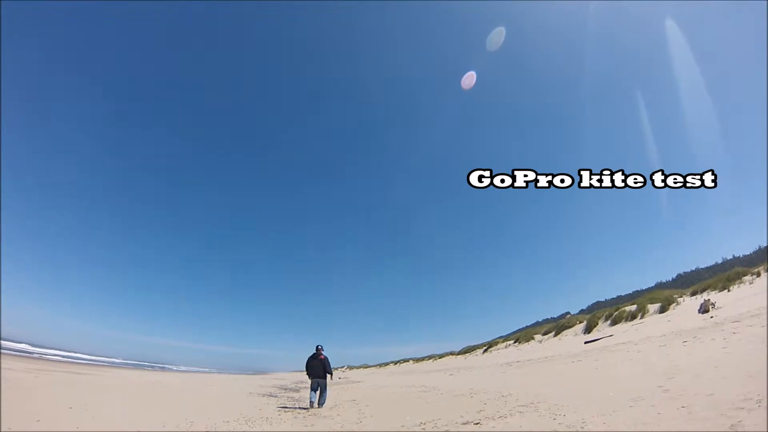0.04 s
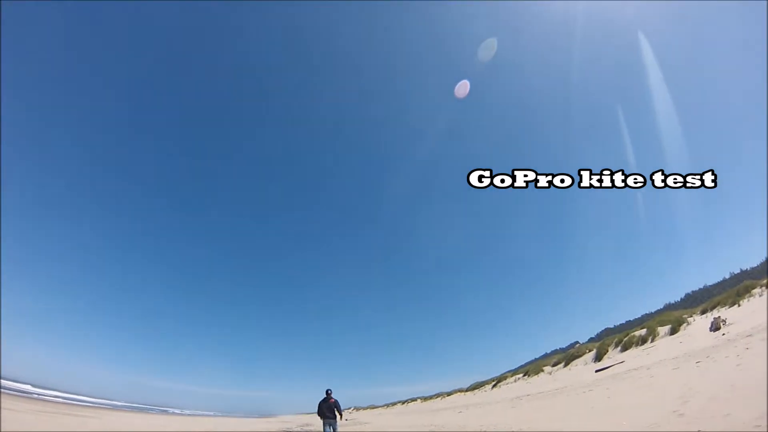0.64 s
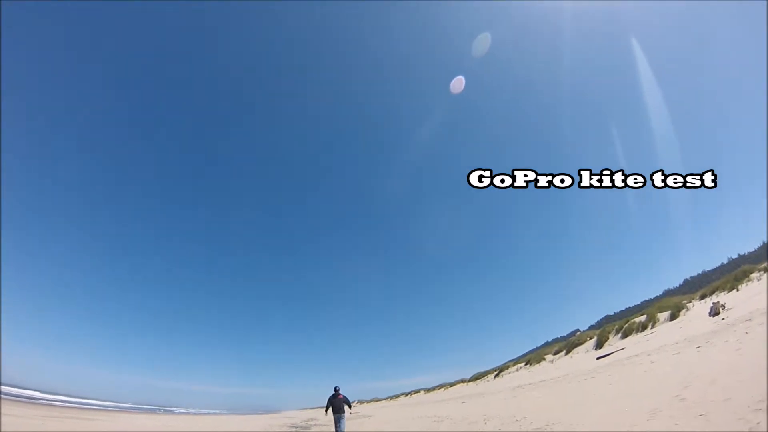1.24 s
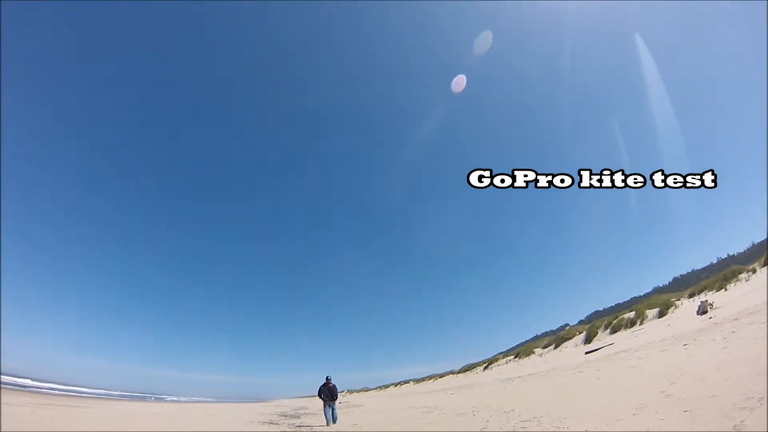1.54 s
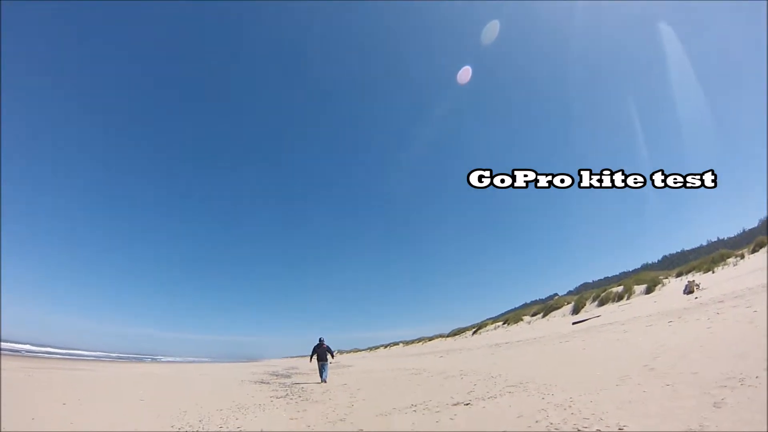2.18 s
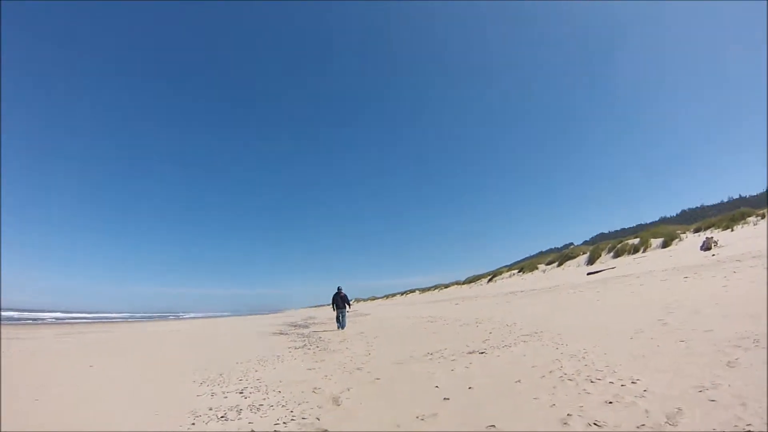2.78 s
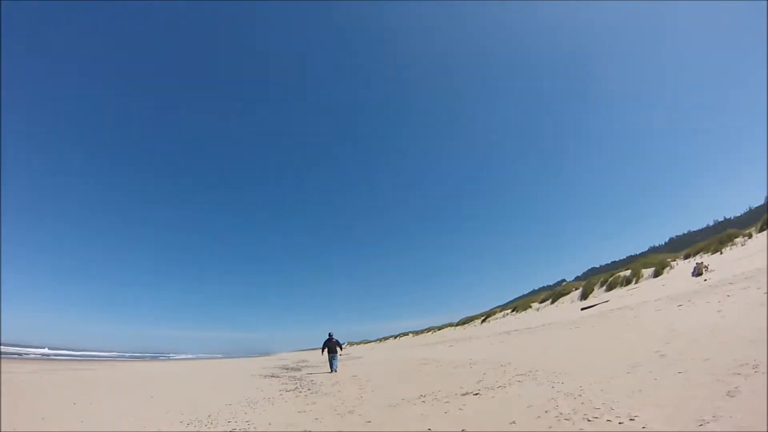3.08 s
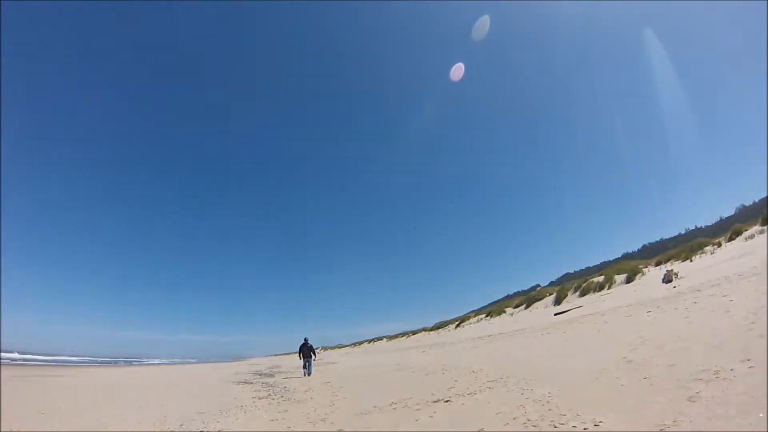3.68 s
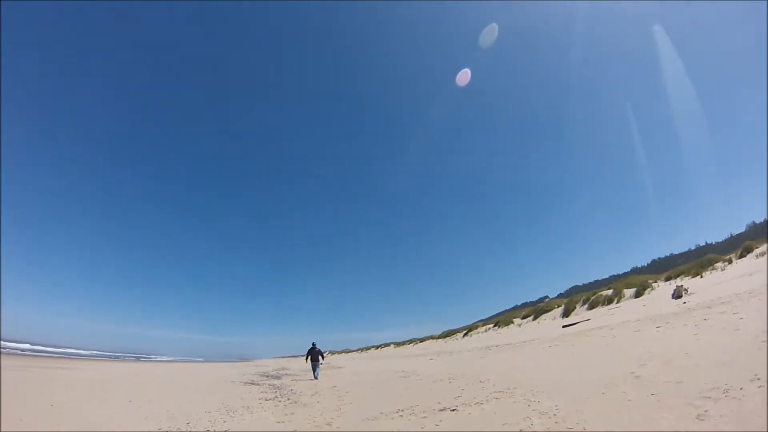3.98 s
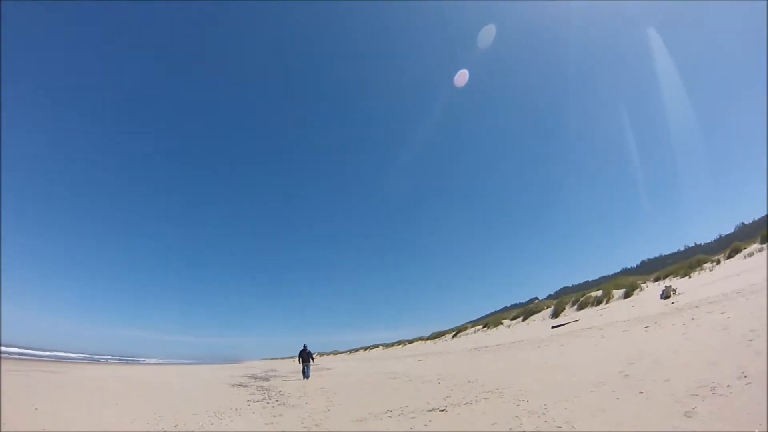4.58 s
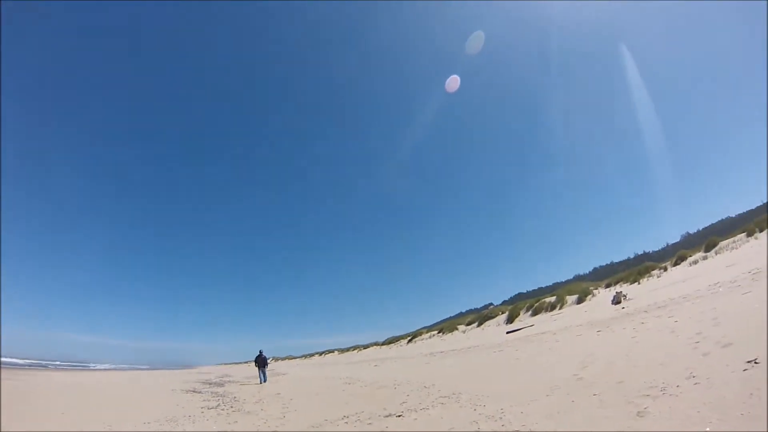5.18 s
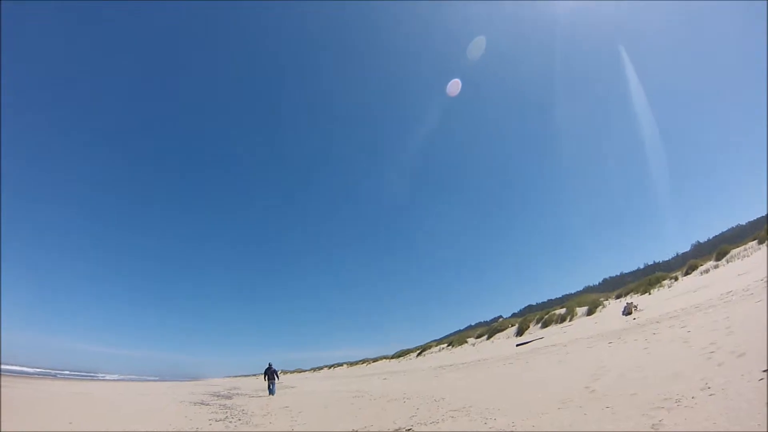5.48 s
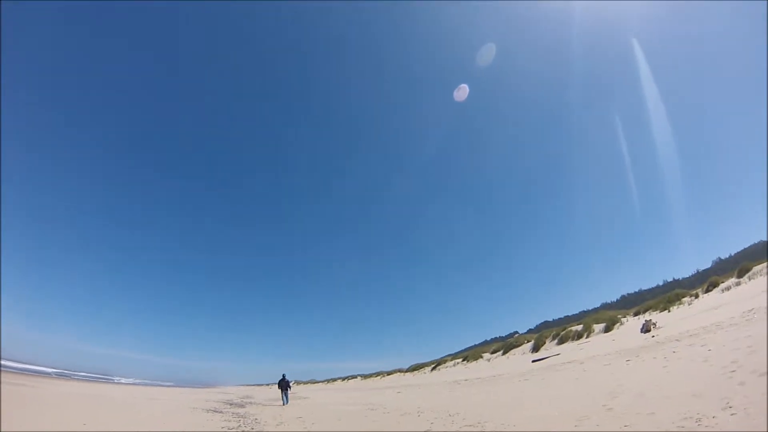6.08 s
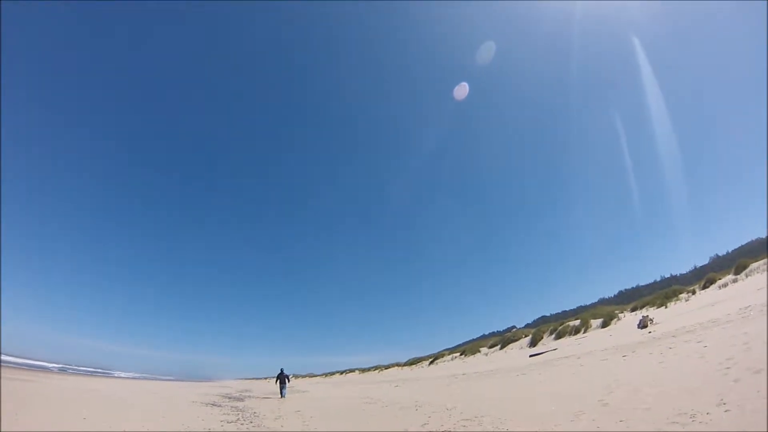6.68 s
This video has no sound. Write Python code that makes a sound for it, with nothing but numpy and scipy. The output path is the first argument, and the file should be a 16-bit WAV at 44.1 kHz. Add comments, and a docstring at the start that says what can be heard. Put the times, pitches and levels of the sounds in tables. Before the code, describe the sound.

Heard from inside a small plastic camera case, low wind comes in puffs and brief lulls, mixed with scratchy rubbing and light clicks. The case then jolts on its mount, giving several close knocks and short scrapes among deep wind thumps. The knocks die away near the end while the wind continues. A few sand grains tick on the shell, and distant surf is barely audible.

```python
"""On an open beach, wind buffets a small camera swaying in a closed plastic housing under a kite.
Turbulent pressure rumbles on the shell, and blown sand strikes it. Friction and impact of the rig
excite the shell's resonances near 1.3 and 2.1 kHz as rubs, ticks and rasps; knocks set the mount
wobbling. Distant surf comes faintly through the same shell, over the hiss of the microphone."""
import sys
import numpy as np
from scipy import signal
from scipy.fft import rfft, irfft, next_fast_len
from scipy.io import wavfile
from scipy.ndimage import uniform_filter1d

SR = 44100
rng = np.random.default_rng(int(sys.argv[2]) if len(sys.argv) > 2 else 0)


def generate_wav(signal):
    """Clip the signal to [-1, 1] and save it as 16-bit WAV at the path in sys.argv[1]."""
    frames = np.transpose(np.atleast_2d(signal))
    scaled = np.clip(frames, -1, 1) * 32767
    pcm = np.round(scaled).astype(np.int16)
    wavfile.write(sys.argv[1], SR, pcm)


N = 301644
T = np.arange(N) / SR

# Spectra of a hard contact and of grit, before the shell colours them.
# Each row: frequency in Hz, relative level in dB.
CONTACT_SPECTRUM = [(150, -19.5), (700, 2.5), (1200, -0.5), (2200, 1.5), (2900, -6.5), (4500, -19),
                    (8000, -29.5), (13000, -41.5)]
GRIT_SPECTRUM = [(1500, -21.5), (2800, 7), (3600, -1), (5200, -3.5), (7000, -10.5), (9000, -18),
                 (13000, -19.5)]


def undb(db):
    """Decibels to amplitude ratio."""
    return 10 ** (np.asarray(db) / 20)


def unit(x):
    """Normalisation to an rms of 1."""
    return x / np.sqrt(np.mean(x ** 2))


def drift(rate_hz):
    """Low-pass noise: random steps smoothed twice, with an rms of 1."""
    hold = max(int(SR / rate_hz), 2)
    steps = np.repeat(rng.standard_normal(N // hold + 1), hold)
    return unit(uniform_filter1d(uniform_filter1d(steps, hold), hold)[:N])


def swell(middle, length, edge_s):
    """A soft-edged window, above half its height for about the given length."""
    return (1 - np.tanh((abs(T - middle) - length / 2) / edge_s)) / 2


def impulses(per_second, spread_db):
    """Shot noise: impulses at random times, mostly weak, a few strong."""
    size = undb(spread_db * np.minimum(rng.exponential(size=N), 5))
    return unit((rng.random(N) < per_second / SR) * size * rng.choice([-1, 1], N))


def housing(x, spectrum, lifts=(), treble_db=0):
    """Source and filter: x takes on its source's spectrum, lifted by the resonances of the shell."""
    # Each row: resonant frequency in Hz, half width in Hz, lift in dB.
    resonances = [(847, 90, 3), (1272, 220, 11), (1675, 94, 4), (2057, 243, 8.5), (2410, 180, 5.5),
                  (3070, 76, 3), (3400, 123, 5.5), (3733, 100, 7.5), (4460, 630, 2.5), (6200, 120, 1),
                  (7400, 280, 2.5)]
    size = 8192
    f = np.maximum(np.fft.rfftfreq(size, 1 / SR), 1)
    hz, db = np.transpose(spectrum)
    treble_shelf = treble_db * f ** 4 / (f ** 4 + 3200 ** 4)
    db = np.interp(np.log(f), np.log(hz), db) + treble_shelf
    for centre, width, lift in [*resonances, *lifts]:
        db = db + lift * np.exp(-((f - centre) / width) ** 2)
    # Folding the cepstrum gives minimum phase: the ringing follows its cause.
    cepstrum = irfft(np.log(undb(db)))
    cepstrum[1:size // 2] *= 2
    cepstrum[size // 2 + 1:] = 0
    response = irfft(np.exp(rfft(cepstrum)))
    return signal.oaconvolve(x, response)[:len(x)]


def wander(x, depth_db, rate_hz, bands=20):
    """Amplitude modulation: third-octave bands swell and fade independently, shifting the timbre."""
    size = next_fast_len(N, True)
    spectrum, f = rfft(x, size), np.fft.rfftfreq(size, 1 / SR)
    band = np.clip(3 * np.log2(f / 102 + 1e-9), 0, bands - 1)
    parts = (irfft(spectrum * np.maximum(1 - abs(band - k), 0), size)[:N] for k in range(bands))
    return unit(sum(part * undb(depth_db * drift(rate_hz)) for part in parts))


def wind():
    """Turbulence: large eddies heave the shell, small ones flutter on it; both sink in the lulls."""
    # Spectra of the large and the small eddies. Each row: frequency in Hz, relative level in dB.
    rumble_spectrum = [(10, -16.5), (24, 0.5), (38, 0), (52, -1), (75, -8.5), (110, -19.5), (180, -31),
                       (400, -73)]
    flutter_spectrum = [(50, -11), (120, 2.5), (200, -2.5), (350, -10.5), (520, -18.5), (900, -23),
                        (2000, -58)]
    # Wind strength before puffs and lulls. Each row: time in seconds, rumble in dB, flutter in dB.
    gusts = [(0, -51, -67), (.75, -58, -68.5), (1.0, -50, -74.5), (1.2, -53, -67.5), (1.6, -55, -68),
             (2.3, -52.5, -63), (2.9, -53.5, -61), (3.15, -49, -49.5), (3.5, -50, -60), (3.8, -50, -56),
             (4.45, -50.5, -65), (4.9, -45, -63), (5.3, -50.5, -62.5), (5.85, -49.5, -63),
             (6.0, -49.5, -64), (6.3, -52, -66.5), (6.84, -48.5, -61.5)]
    # The air drops away briefly. Each row: midpoint in seconds, length in seconds.
    lulls = [(0.0, 0.1), (0.29, 0.034), (.7, 0.053), (1.517, 0.021), (1.92, 0.1), (2.395, .05),
             (2.608, 0.14), (2.835, 0.11), (3.01, .08), (3.281, 0.068), (4.314, 0.11), (5.22, 0.067),
             (5.636, 0.023), (6.243, 0.029)]
    times, *levels = np.transpose(gusts)
    rumble_db, flutter_db = (np.interp(T, times, db) for db in levels)
    rumble = housing(rng.standard_normal(N), rumble_spectrum)
    # With its envelope evened out, the rumble follows the gusts.
    rumble /= np.sqrt(uniform_filter1d(rumble ** 2, size=4000) + 1e-12)
    flutter = unit(housing(impulses(260, spread_db=2.37), flutter_spectrum, lifts=[(328, 89, 1.8)]))
    puff = undb(2.66 * drift(rate_hz=22))
    lull = sum(swell(middle, length, edge_s=0.018) for middle, length in lulls)
    return puff * (rumble * undb(rumble_db - 10.5 * lull) + flutter * undb(flutter_db - 9 * lull))


def surf():
    """Transmission loss: the shell muffles far breakers; a thin hiss lies on top."""
    # Surf and hiss together. Each row: frequency in Hz, relative level in dB.
    spectrum = [(60, -0.5), (250, -1), (500, 2), (1000, -7.5), (1400, -11), (2200, -16.5), (3000, -29.5),
                (6000, -20), (9000, -23.5), (13000, -25.5)]
    wash = unit(housing(rng.standard_normal(N), spectrum))
    return wash * undb(-72.5 + 0.5 * drift(rate_hz=1.7))


def sliding():
    """Incoherent powers add: strokes over a fading creep give relative rub and grit levels in dB."""
    # The rig slides on its mount. Each row: midpoint in seconds, length in seconds,
    # relative level in dB, grit offset from that level in dB.
    strokes = [(0.091, 0.028, -62, -11), (.21, 0.079, -63, -9), (0.423, .11, -64, -10),
               (0.562, 0.071, -71, 0.5), (0.749, 0.084, -64, -10.5), (1.192, 0.11, -62, -12),
               (1.346, 0.11, -68.5, -11), (1.857, 0.15, -68.5, -10), (2.036, 0.094, -64.5, -6.5),
               (2.267, 0.43, -67, -9), (2.55, 0.21, -63.5, -4.5), (2.731, 0.13, -63.5, -6.5),
               (2.913, 0.18, -64.5, -6.5), (3.075, 0.15, -56, -5), (3.191, 0.055, -55, -9),
               (3.344, 0.19, -63, -8), (3.593, 0.11, -60, -9.5), (3.716, 0.1, -61, -15.5),
               (3.862, 0.058, -63.5, -23), (4.07, 0.026, -66, -16), (4.15, 0.09, -62.5, -8),
               (4.328, 0.022, -59.5, -6), (4.418, 0.042, -68.5, 0.5), (4.581, 0.089, -63.5, -2.5),
               (4.687, 0.074, -59.5, -16.5), (4.843, .075, -54.5, -13), (4.955, 0.13, -61, -8),
               (5.077, 0.026, -66, -7), (5.498, 0.13, -66.5, -14), (5.63, 0.19, -65, -7),
               (5.776, 0.096, -64.5, -13), (5.992, 0.065, -60, -17), (6.107, 0.12, -67.5, -27),
               (6.406, 0.065, -67, -11), (6.684, 0.059, -71.5, -23)]
    creep = undb(-0.37 * T)  # the mount never quite rests
    rub, grit = (creep * undb(-70.5)) ** 2, (creep * undb(-79.5)) ** 2
    for middle, length, db, grit_db in strokes:
        power = swell(middle, length, edge_s=0.013) * undb(db) ** 2
        rub += power
        grit += power * undb(grit_db) ** 2
    return 10 * np.log10(rub), 10 * np.log10(grit)


def rubbing():
    """Stick-slip friction: dense tiny slips ring the shell, with a gritty edge and stray crackles."""
    # Spectrum of the rub. Each row: frequency in Hz, relative level in dB.
    friction_spectrum = [(100, 13), (400, 0.5), (700, 1), (1000, -4.5), (1500, 1.5), (2300, -2.5),
                         (2750, -21.5), (4000, -27), (7000, -29.5), (13000, -40.5)]
    rub_db, grit_db = sliding()
    grip = undb(1.96 * drift(rate_hz=90))
    rub = housing(impulses(3500, spread_db=2.9), friction_spectrum)
    rub = wander(rub, depth_db=3.0, rate_hz=18) * undb(rub_db + 1.55)
    grit = housing(impulses(2500, spread_db=1.3), GRIT_SPECTRUM)
    grit = wander(grit, depth_db=3.5, rate_hz=13) * undb(grit_db - 2.0)
    crackle = housing(impulses(38, spread_db=1.5), CONTACT_SPECTRUM, treble_db=6)
    return grip * (rub + grit) + unit(crackle) * undb(rub_db - 6.5)


def ticks():
    """Impulse response: the mount catches and chatters; the place of contact favours one resonance."""
    # Each row: start in seconds, relative level in dB, brightness (-27.5 is neutral),
    # favoured frequency in Hz.
    catches = [(0.303, -47, -22, 2290), (0.352, -49, -51, 1320), (0.485, -44.5, -27, 1440),
               (0.7966, -50, -37, 2070), (0.902, -41.5, -31, 1430), (1.3039, -51.5, -20, 1130),
               (1.4232, -46.5, -34, 2210), (1.5337, -53.5, -18, 1373), (1.9795, -43.5, -24, 1720),
               (2.005, -45.5, -16.5, 1170), (2.0203, -42, -30, 2100), (2.0411, -46, -52, 1160),
               (2.223, -47.5, -19, 2060), (2.7447, -37, -48, 1460), (2.826, -48, -19, 2000),
               (2.8612, -42, -18, 1970), (3.3226, -34, -22.5, 1120), (3.41, -32, -20.5, 2140),
               (3.631, -46.5, -57, 1200), (4.0313, -47, -36, 1950), (4.1766, -38.5, -30, 1280),
               (4.443, -51, -22, 1460), (4.586, -43, -42, 910), (4.8773, -46.5, -30, 2200),
               (4.931, -36.5, -18.5, 2030), (4.9763, -28, -29, 1700), (5.394, -38, -26, 2000),
               (6.08, -40.5, -27, 1250)]
    out, t = np.zeros(N), np.arange(2048) / SR
    for start, db, brightness, hz in catches:
        impulse = t == 0
        chatter = 0.11 * rng.standard_normal(len(t)) * np.exp(-t / 0.0025)
        treble_db = 1.37 * (brightness + 27.5)
        tick = housing(impulse + chatter, CONTACT_SPECTRUM, lifts=[(hz, 280, 7)], treble_db=treble_db)
        add(out, start + 0.00059, undb(db - 16.5) * unit(tick))
    return out


def knocks():
    """Damped vibration: after a short push the housing thuds, springs back and wobbles on its mount."""
    # Each row: time in seconds, peak level in dB, relative contact duration, wobble from 0 to 1.
    jolts = [(0.485, -43, 0.78, 0.15), (1.318, -43.5, 0.42, 0), (1.981, -28.5, 0.57, 0.08),
             (2.041, -29, 0.43, 0), (2.168, -37.5, 1.45, 0.1), (2.53, -37.5, 1.16, 0.14),
             (2.683, -45.5, 0.69, 0.42), (2.906, -42, 1.3, 0.38), (3.079, -28, 0.95, 0.32),
             (3.323, -17.5, 1.3, 0.46), (3.349, -26.5, 0.88, 0.02), (3.379, -35, 1.3, 0),
             (3.47, -41, 1.7, 0.6), (3.651, -32, 0.89, 1), (3.66, -38.5, 0.43, 0.7), (3.673, -36, 2, 0.65),
             (3.814, -46, 0.53, 0.65), (3.845, -41, 0.73, 1), (3.953, -32.5, 1.1, 0),
             (4.177, -24.5, 0.89, 0), (4.197, -38, 1.34, 0.9), (4.443, -34.5, 0.7, 0.12),
             (4.58, -32.5, 1.03, 0), (4.88, -23.5, 1.16, 0.49), (4.977, -20, 0.76, 0.6),
             (5.009, -41, 0.59, 0.24), (5.072, -40.5, 1.9, 1), (5.126, -36.5, 1.48, 0.3),
             (5.256, -36, 0.95, 0), (5.376, -31.5, 1.4, 0.04)]
    # Modes of the mount. Each row: frequency in Hz, 60 dB decay time in seconds, relative level in dB.
    modes = [(162, 0.039, 0.5), (272, 0.048, -2), (355, 0.062, -0.5), (556, 0.025, 6)]
    out, t = np.zeros(N), np.arange(4096) / SR
    lead_s = 0.01
    ring = sum(undb(db) * np.sin(2 * np.pi * hz * t) * np.exp(-np.log(1000) * t / t60)
               for hz, t60, db in modes)
    highpass = signal.butter(1, 45, "high", fs=SR, output="sos")
    for time, db, contact, wobble in jolts:
        width_s = 0.00176 * contact
        push = 1 / (1 + ((t - lead_s) / width_s) ** 2) ** 2
        swing = signal.fftconvolve(push, ring)[:len(t)]
        thud = signal.sosfilt(highpass, push - 1.41 * wobble * swing / abs(swing).max())
        add(out, time - lead_s, undb(db) * thud / abs(thud).max())
    return out


def scrapes():
    """Friction noise: a rasp swells and dies as the mount gives way, ringing one part of the shell."""
    # Each row: midpoint in seconds, level in dB, spread in seconds, treble gain in dB,
    # favoured frequency in Hz.
    slips = [(.555, -64.5, 0.017, 13, 3400), (2.55, -64, 0.1, 6, 3600), (2.678, -66, 0.0052, 22, 7160),
             (2.703, -55.5, 0.0067, -40, 1120), (2.747, -43, 0.0029, 4, 1960),
             (3.109, -49, 0.0055, 15.5, 2250), (3.284, -48.5, 0.0079, 17.5, 3200),
             (4.18, -49, 0.0024, -4, 1980), (4.583, -69.5, 0.016, 41, 7350), (4.9718, -38, 0.0019, 3, 2250),
             (4.9772, -31, 0.0016, 3, 3400)]
    out, t = np.zeros(N), np.arange(-4096, 4096) / SR
    for middle, db, spread, treble_db, hz in slips:
        friction = rng.standard_normal(len(t)) * np.exp(-(t / spread) ** 2 / 2)
        rasp = housing(friction, CONTACT_SPECTRUM, lifts=[(hz, 0.16 * hz, 6)], treble_db=treble_db)
        rms = np.sqrt(np.sum(rasp ** 2) / (2 * spread * SR))
        add(out, middle + t[0], undb(db) * rasp / rms)
    return out


def buffets():
    """Convected pressure: each eddy passing the shell gives one swing of compression and suction."""
    # Each row: midpoint in seconds, peak level in dB, dominant frequency in Hz.
    eddies = [(1.002, -50, 58), (1.186, -41, 49.6), (2.326, -46, 32.5), (3.094, -40, 40),
              (3.333, -31.5, 35), (3.553, -33, 56), (3.636, -26.5, 54.6), (3.773, -37, 38),
              (3.996, -34.5, 40), (4.06, -25.5, 50), (4.179, -29.5, 68.4), (4.5, -34.5, 33.4),
              (4.649, -34, 31.5), (4.93, -28, 32.4), (4.994, -30.5, 47.6), (5.179, -39, 31.3),
              (5.994, -42, 91)]
    out, t = np.zeros(N), np.arange(-2048, 2048) / SR
    for middle, db, hz in eddies:
        phase = 2 * np.pi * hz * t
        add(out, middle + t[0], -undb(db) * phase * np.exp((1 - phase ** 2) / 2))
    return out


def sand():
    """Brief impact: small, hard grains excite mainly the high resonances of the shell."""
    # Each row: start in seconds, relative peak level in dB.
    grains = [(1.643, -58), (2.172, -61), (2.404, -58.5), (2.469, -63), (2.8855, -53), (2.897, -56),
              (3.576, -55), (4.383, -57.5), (5.021, -59), (5.082, -59), (5.609, -60), (5.774, -55),
              (5.994, -61)]
    out, t = np.zeros(N), np.arange(1024) / SR
    for start, db in grains:
        burst = rng.standard_normal(len(t)) * np.exp(-t / 0.0026)
        hit = housing(burst, GRIT_SPECTRUM, lifts=[(7460, 1000, 8.7)], treble_db=7)
        add(out, start, undb(db + 1.5) * hit / abs(hit).max())
    return out


def add(out, start, x):
    """Superposition: x joins out from the start time in seconds."""
    i = max(int(start * SR), 0)
    out[i:i + len(x)] += x[:max(N - i, 0)]


def scene():
    """Superposition: all pressures sum at one microphone inside the housing."""
    return (wind() + buffets() + knocks() + rubbing() + scrapes() + ticks() + sand() + surf())[None]


def record(dry):
    """Band limiting: the camera's steep low-pass filter cuts the top of the treble."""
    cutoff_hz = 12850
    return signal.sosfilt(signal.ellip(10, 0.2, 70, cutoff_hz, fs=SR, output="sos"), dry)


dry = scene()
out = record(dry)
generate_wav(out)
```